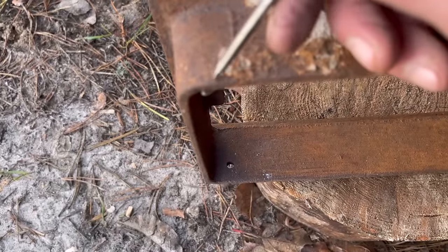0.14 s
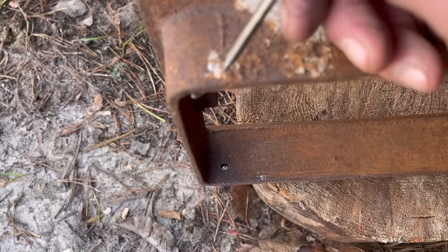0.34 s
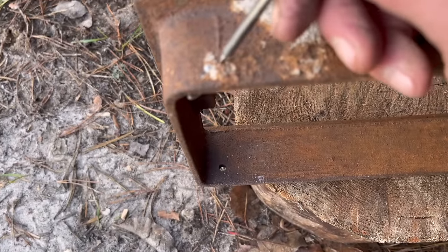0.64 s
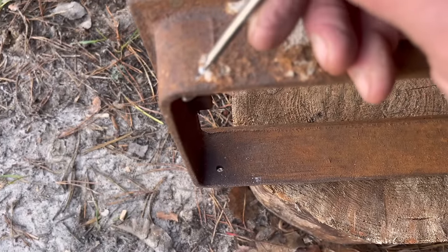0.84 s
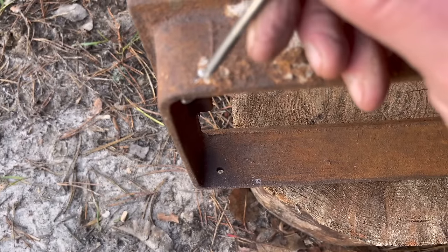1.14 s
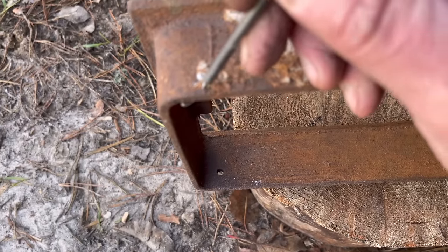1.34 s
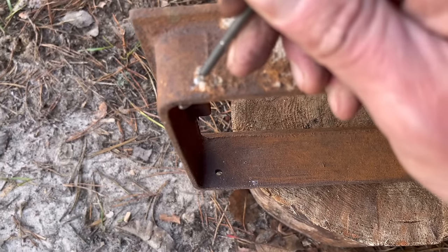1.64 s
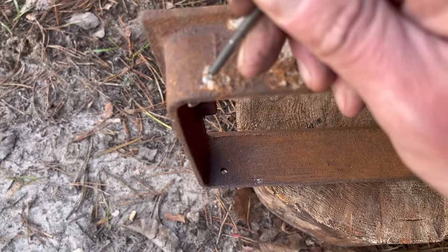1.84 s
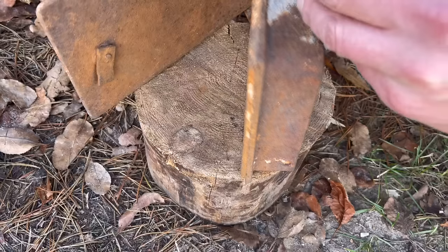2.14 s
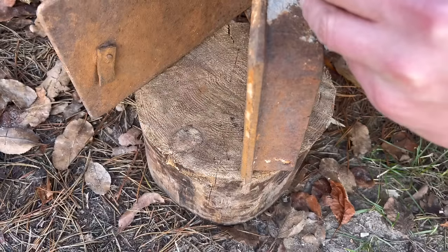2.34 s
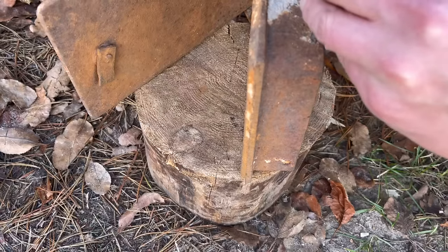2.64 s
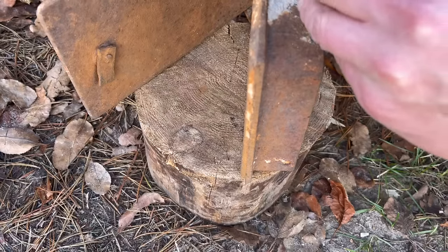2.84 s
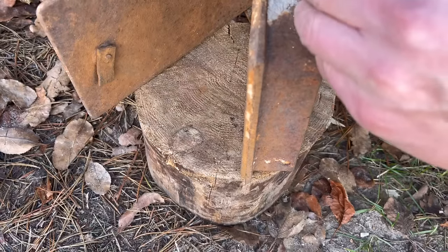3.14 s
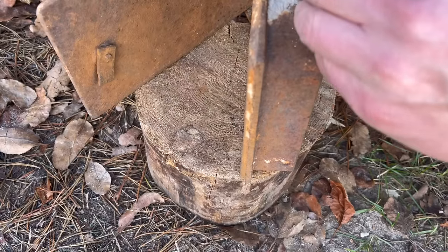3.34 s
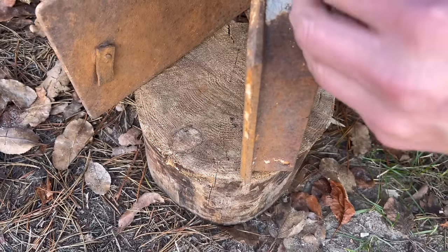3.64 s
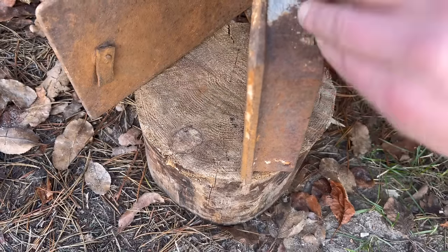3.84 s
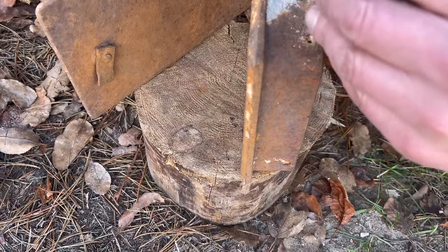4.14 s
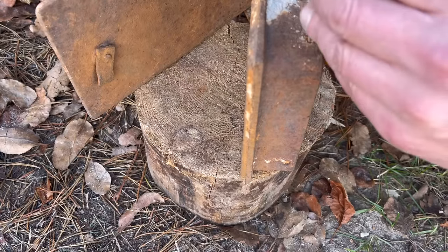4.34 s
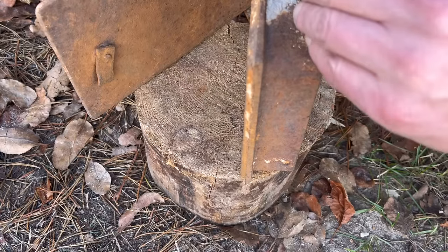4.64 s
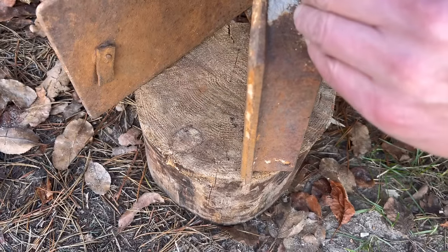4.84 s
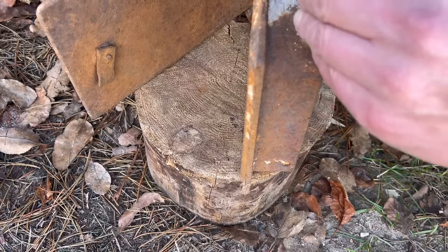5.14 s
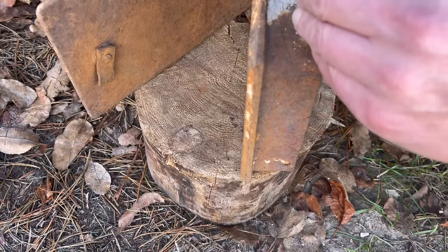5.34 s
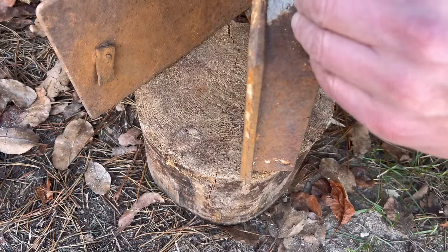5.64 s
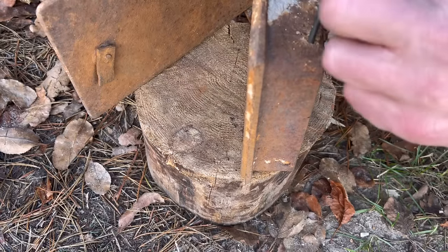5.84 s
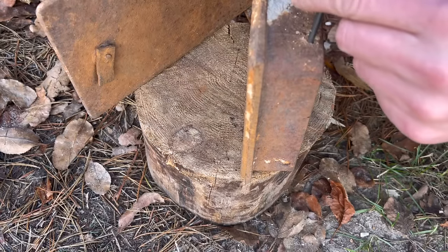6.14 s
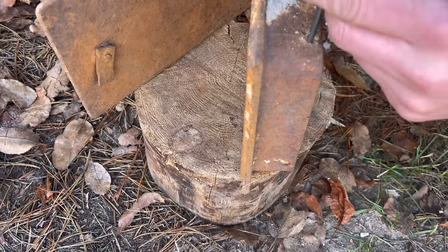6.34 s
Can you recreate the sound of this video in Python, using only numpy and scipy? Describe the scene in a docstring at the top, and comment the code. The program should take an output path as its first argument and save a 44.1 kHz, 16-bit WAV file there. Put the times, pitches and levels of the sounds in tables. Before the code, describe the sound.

Small irregular metal ticks and short gritty scratches come first, close to a phone microphone. Then hammer on nail: bright, short steel rings with a dull frame thud and ground shake, four evenly spaced. After a gap with soft skin hiss and barely audible scrapes, six further strikes come at a quick steady pace, losing their low thud. Dry, quiet outdoor setting.

```python
"""Hammering a nail on rusty steel

A rusty steel frame lies on a tree stump outdoors, close to a phone. A nail is scratched and set down on it,
then hammered. Each blow rings nail and steel as decaying modes and bursts of coloured noise; heavy ones also
make the frame clatter, thud on the stump and shake the ground. Between blows the fingers rub as wavering hiss
and grit ticks on the rust. Phone rumble and quiet outdoor air, both coloured noise, lie underneath.
"""
import sys
import numpy as np
from scipy import signal
from scipy.fft import rfft, irfft, next_fast_len
from scipy.io import wavfile
from scipy.ndimage import uniform_filter1d

SR = 44100
rng = np.random.default_rng(int(sys.argv[2]) if len(sys.argv) > 2 else 0)


def int16_out(signal):
    """Quantize to a 16-bit WAV file."""
    q = np.round(np.clip(np.atleast_2d(signal).T, -1, 1) * 32767)
    wavfile.write(sys.argv[1], SR, q.astype(np.int16))


N = 285768

# Hammer blows. Each row: start in seconds, drive into the frame in dB, ring level in dB, tick level in dB,
# rebound delay in seconds, landing relative to first push in dB, frequency favoured by the contact in Hz.
HAMMER_BLOWS = [(2.1409, -20, -16.5, -24.5, 0.0058, -2.5, 7070),
                (2.538, -20.5, -18.5, -25, 0.0058, -11, 7050),
                (2.9026, -25.5, -18.5, -19.5, 0.024, -6.5, 4160),
                (3.251, -21, -16.5, -23, 0.0062, -10.5, 8750),
                (4.7727, -24.5, -22.5, -23.5, 0.018, 3, 4310), (5.0882, -24.5, -17, -22, 0.014, 1, 6370),
                (5.3813, -29, -19, -22, 0.017, 2.5, 8640), (5.6828, -46, -23, -25.5, 0.011, -7.5, 6160),
                (5.9782, -44.5, -21.5, -27.5, 0.0093, 5.5, 2970),
                (6.2375, -50, -22.5, -34, 0.011, -18.5, 8320)]
# Modes of the steel. Each row: frequency in Hz, time to fall by 60 dB in seconds,
# relative level in dB when hammered, relative level in dB when touched by the nail tip.
STEEL_MODES = [(291, 0.15, -5, -14), (800, 0.11, 8, -19), (822, 0.15, 2, -20), (1174, 0.08, 4, -13),
               (1330, 0.15, -18, -4), (1550, 0.16, -3, -18), (1638, 0.26, -15, -8), (1863, 0.1, -3, -11),
               (2150, 0.09, 4, -8), (2256, 0.13, 4, -5), (2417, 0.42, -19, -37), (2710, 0.11, 2, -13),
               (2907, 0.2, -12, -22), (3214, 1.4, -36, -48), (3280, 0.1, -5, -2), (4054, 0.12, -22, -2),
               (4375, 0.09, -6, 2), (4560, 0.09, -2, -2), (4790, 0.14, -24, -14), (5992, 0.2, -16, -25),
               (6372, 0.12, -11, -2), (6742, 0.09, -9, -10), (7079, 0.17, -28, -11), (7881, 0.13, -30, -6),
               (8140, 0.13, -6, -12), (8484, 0.13, -25, -9), (8689, 0.16, -15, -23), (9398, 0.13, -11, -14),
               (9604, 0.21, -12, -29), (11500, 0.13, -19, -19)]
# The nail tip lands or catches. Each row: start in seconds, level in dB, body relative to treble in dB.
TIP_TOUCHES = [(.1, -46, -2.5), (.153, -49, 2), (0.228, -50.5, 0), (.243, -37.5, -1.5), (.3105, -30, -8.5),
               (.406, -44, 3.5), (.449, -33.5, 1), (.460, -31.5, -3.5), (0.555, -54.5, 3.5),
               (0.593, -58, -0.5), (.766, -36.5, 5.5), (1.147, -44, 1), (1.181, -49.5, -5),
               (1.2749, -45.5, 0.5), (1.578, -49, -20), (1.602, -40, -4.5), (1.634, -47, -11.5),
               (2.987, -37, -18)]
# The tip is dragged over the rust. Each row: start in seconds, end in seconds, level in dB,
# body relative to treble in dB.
TIP_SCRAPES = [(0.079, 0.124, -46, -2.5), (0.241, 0.328, -42, -1.5), (0.761, 0.803, -37.5, 6.5),
               (1.149, 1.190, -51.5, 0), (1.57, 1.643, -48, -17), (3.548, 3.633, -61, -15.5),
               (3.728, 3.776, -56.5, -1.5), (3.826, 3.909, -59, 2), (4.351, 4.39, -67, 2),
               (4.717, 4.766, -60.5, -1.5)]
# How freely the frame rings under the steadying hand. Each row: time in seconds, relative level in dB.
FRAME_FREEDOM = [(1.15, 0), (1.7, -6), (2.99, -2), (3.6, -2.5)]
# Grit cracks without ringing. Each row: start in seconds, relative level in dB.
GRIT_CRACKS = [(1.445, -56), (1.518, -58), (1.711, -56), (2.818, -58.5), (2.842, -60.5), (3.101, -57.5),
               (3.131, -52), (3.444, -56)]
# Soft bumps of hand and frame on the stump. Each row: start in seconds, level in dB.
STUMP_BUMPS = [(.865, -53.5), (1.618, -58.5), (2.09, -54), (2.455, -52.5), (3.33, -47), (3.88, -53.5),
               (3.949, -53.5), (5.925, -57.5)]
# Fingers slide on nail and frame. Each row: start in seconds, end in seconds, relative hiss level in dB.
FINGER_RUBS = [(.1, 0.678, -73.5), (1.3, 1.5, -66.5), (1.87, 1.927, -59.5), (2.05, 2.402, -61),
               (2.397, 3.45, -67), (3.45, 4.097, -66.5), (4.37, 4.92, -70), (5.1, 6.476, -64),
               (5.48, 5.656, -60), (6.39, 6.481, -58.5)]

# Noise colours. Each row of every colour: frequency in Hz, relative level in dB.
# The frame on the stump: dull thud and metallic clatter.
THUD_COLOUR = [(40, -18.5), (75, -2.5), (190, -0.5), (300, -7), (400, -1), (510, -10), (800, -5.5),
               (1200, -14.5), (2000, -40)]
CLANG_COLOUR = [(500, -26), (900, -17), (1200, 3.5), (1400, -5.5), (1580, 0), (1950, -4), (2300, -3),
                (2700, -0.5), (3350, -7), (3700, -7.5), (6000, -26)]
# Dense high modes of the steel, under the hammer and under the nail tip.
RING_COLOUR = [(1500, -36.5), (3000, -12), (3700, -9), (4500, 1), (5300, -5), (6500, -3), (7500, -3.5),
               (8500, 0.5), (9200, -15), (10300, 10.5), (11400, -6.5), (12200, -9), (13200, -32),
               (15500, -45.5)]
TIP_COLOUR = [(1500, -44), (3000, -4.5), (3600, 0), (4050, 2.5), (4600, -17.5), (5400, 0.5), (6700, -2.5),
              (7400, -3), (8500, -3), (9500, -4), (11300, 12), (12300, -28.5), (13500, -27.5),
              (15500, -32.5)]
# Dense low modes of the steel under the nail tip.
BODY_COLOUR = [(30, -24), (85, -4), (130, 5.5), (420, 1), (560, 0.5), (900, -1.5), (1350, -4.5), (2200, -5),
               (3000, -2.5), (4500, -23)]
# The click of steel on steel, and the crack of grit.
TICK_COLOUR = [(1000, -23), (3600, -13), (4500, -2.5), (5400, -5), (8000, -10.5), (11500, 5.5),
               (12800, -17.5), (16000, -32)]
CRACK_COLOUR = [(2500, -24), (3500, -2.5), (6000, -10), (10000, -1.5), (12500, 1)]
# Finger skin on metal.
SKIN_COLOUR = [(200, 4.5), (900, 0), (2200, 0.5), (4500, 1), (6500, -3.5), (8800, 1), (11000, 7),
               (12000, -6.5), (13000, -28.5)]
# Shaking ground, also used for phone rumble.
GROUND_COLOUR = [(20, -20.5), (45, -9), (70, -6), (92, -5), (120, -17), (220, -29.5), (600, -56.5)]
# Outdoor air.
AIR_COLOUR = [(30, 5.5), (90, 17.5), (200, 6), (500, 3), (1000, -11), (2500, -2), (5000, -15), (11000, -9),
              (13000, -29)]
# Phase between the two microphone ports. Each row: frequency in Hz, lead of the left in radians.
PORT_PHASE_LEAD = [(100, 0), (500, .3), (1200, 0), (1700, -.6), (2300, .5), (2900, 1.5), (3450, 1.3),
                   (3750, 0), (5200, 1.0), (6600, 0), (7550, 1.5), (8500, .1), (10200, -3.1), (13400, -9)]
# Level between the ports. Each row: frequency in Hz, left minus right in dB.
PORT_LEVEL_BALANCE = [(150, .7), (1100, 3), (1600, 1), (2000, 5), (3000, 2), (4000, 2), (4900, 6),
                      (6100, 0), (7300, 6), (8200, .5), (12000, 0)]

AGE = np.arange(int(1.2 * SR)) / SR  # seconds since a contact
ATTACK = int(.03 * SR)  # samples
# Weaker modes crowd round the strong ones: fine peaks and valleys, the same for every contact.
CROWD_HZ = np.arange(0, SR / 2, 45)
CLUSTERS = np.exp(-((CROWD_HZ - np.array(STEEL_MODES)[:, :1]) / 85) ** 2).max(axis=0)
CROWD = 2.2 * CLUSTERS + .7 * rng.standard_normal(len(CROWD_HZ))

# Parts of a blow follow its drive: level in dB at full drive, and dB gained per dB of drive.
FULL_DRIVE_DB = -24
CLANG_DB, CLANG_SLOPE = -26, 1  # clatter, relative to the share of each contact
SHAKE_DB, SHAKE_SLOPE = -36, 0.59  # ground
FLEX_DB, FLEX_SLOPE = -29, 1.25  # lowest modes, below FLEX_TOP_HZ
BEND_DB, BEND_SLOPE = -26, 0.93  # higher bending modes, below BEND_TOP_HZ
FLEX_TOP_HZ, BEND_TOP_HZ = 1000, 2800
# High modes near the favoured frequency speak more: boost and width.
FAVOUR_DB, FAVOUR_OCTAVES = 5.5, 0.043
# For the last blows the hand holds the frame loosely, and its long-lived modes ring louder.
LOOSE_FROM_S, LONG_T60_S, LOOSE_DB = 5.3, .25, 4.5
# After a touch the tip settles once more, faintly: mean delay and level.
SETTLE_S, SETTLE_DB = .06, -62
SLIPS_PER_S, SLIP_SPREAD_DB = 450, 5  # mean rate and unevenness of a scrape's jumps
# Finger movements; the hiss of a still grip is relative, like the rubs.
RUB_ATTACK_S, RUB_RELEASE_S, GRIP_DB = 0.042, 0.02, -81.5
WAVER_DB, WAVER_S = 1.5, .07  # slow wavering of finger pressure: spread and time scale
# The phone sways with each swing of the arm; its level is relative to the shake of the ground.
SWAY_DB, SWAY_LAG_S, SWAY_WIDTH_S = -19.5, 0.1, 0.095
# Rumble of the held phone at rest, and while the nail is worked into place.
STILL_DB, PLACING_DB, PLACING_END_S = -74, -64.5, 1.33
TOP_HZ = 16400  # upper limit of the phone


def hammer(shapes):
    """Steel meets steel with a tick and a ring, and the struck frame jolts the stump and ground."""
    out = np.zeros((2, N))
    hz, t60, held_db, _ = np.transpose(STEEL_MODES)
    for t, drive_db, ring_db, tick_db, delay, rebound_db, favoured_hz in HAMMER_BLOWS:
        mode_db = held_db + LOOSE_DB * (t > LOOSE_FROM_S) * (t60 > LONG_T60_S)
        # the first push and the landing share the energy of thud and clatter
        shares = np.array([1, undb(rebound_db)]) / np.hypot(1, undb(rebound_db))
        add(out, t, undb(tick_db) * burst(TICK_COLOUR, rise=.0003, t60=0.018))
        add(out, t, undb(ring_db) * struck_ring(shapes, mode_db, favoured_hz))
        for lag, share in zip((.0008, delay), shares):
            add(out, t + lag, share * frame_on_stump(drive_db))
        # bending modes start between the two contacts, nearer the stronger one
        add(out, t + delay * shares[1] ** 2, frame_bending(shapes, mode_db, drive_db))
        add(out, t, undb(shake_level(drive_db)) * burst(GROUND_COLOUR, rise=0.0054, t60=.36))
    return out


def struck_ring(shapes, mode_db, favoured_hz):
    """Where the head lands on the nail decides which high modes speak most; a dense crowd rings along."""
    hz = np.transpose(STEEL_MODES)[0]
    octaves_off = np.log2(hz / favoured_hz)
    favour_db = FAVOUR_DB * np.exp(-(octaves_off / FAVOUR_OCTAVES) ** 2)
    high_modes = ring(shapes, undb(mode_db + favour_db + .5) * (hz >= BEND_TOP_HZ))
    return high_modes + undb(-4.5) * burst(RING_COLOUR, rise=.001, t60=.088)


def frame_on_stump(drive_db):
    """One contact of frame and stump: a dull thud with a clatter of dense modes."""
    thud = undb(drive_db) * burst(THUD_COLOUR, rise=.002, t60=.075)
    clang_db = follow(drive_db, CLANG_DB, CLANG_SLOPE)
    return thud + undb(clang_db) * burst(CLANG_COLOUR, rise=.002, t60=.11)


def frame_bending(shapes, mode_db, drive_db):
    """The frame flexes and rings on in its low modes; the lowest fade fastest as blows get lighter."""
    hz = np.transpose(STEEL_MODES)[0]
    flex_db = follow(drive_db, FLEX_DB, FLEX_SLOPE)
    bend_db = follow(drive_db, BEND_DB, BEND_SLOPE)
    low_db = np.where(hz < FLEX_TOP_HZ, flex_db, bend_db)
    return ring(shapes, undb(mode_db + low_db) * (hz < BEND_TOP_HZ))


def shake_level(drive_db):
    """The ground shakes less unevenly than the frame is driven; level in dB."""
    return follow(drive_db, SHAKE_DB, SHAKE_SLOPE)


def nail_touches(shapes):
    """The tip taps down or catches, nudges the ground, and settles once more."""
    out = np.zeros((2, N))
    for t, db, body_db in TIP_TOUCHES:
        add(out, t, undb(db) * tip_response(shapes, t, body_db))
        settle_delay = SETTLE_S * (.5 + rng.random())
        add(out, t + settle_delay, undb(SETTLE_DB) * tip_response(shapes, t, body_db))
        add(out, t, undb(db + body_db - 19.5) * burst(GROUND_COLOUR, rise=0.0059, t60=0.2))
    return out


def nail_scrapes(shapes):
    """The tip sticks and slips over the rust in uneven little jumps, each exciting the frame."""
    out = np.zeros((2, N))
    for start, end, db, body_db in TIP_SCRAPES:
        n = max(int((end - start) * SR), ATTACK)
        jumps = rng.random(n) < SLIPS_PER_S / SR
        strengths = undb(SLIP_SPREAD_DB * rng.standard_normal(n))
        slips = jumps * strengths * signal.windows.tukey(n, .4)
        x = signal.fftconvolve(tip_response(shapes, start, body_db), slips[None], axes=1)
        rms = np.sqrt(np.mean(x[:, :n] ** 2) + 1e-18)
        add(out, start, undb(db) * x / rms)
    return out


def tip_response(shapes, t, body_db):
    """The frame's answer to one catch of the nail tip; the less it moves the body, the more it ticks."""
    hz, _, _, mode_db = np.transpose(STEEL_MODES)
    free_db = np.interp(t, *np.transpose(FRAME_FREEDOM))
    modes = ring(shapes, undb(mode_db + free_db - 2.5 + body_db * (hz < BEND_TOP_HZ)))
    treble = undb(-3) * burst(TIP_COLOUR, rise=.0006, t60=.085)
    body = undb(body_db - 10) * burst(BODY_COLOUR, rise=.001, t60=.11)
    tick = undb(-13.0 - 0.4 * body_db) * burst(TICK_COLOUR, rise=0.00021, t60=0.01)
    return modes + treble + body + tick


def grit():
    """Grains crack on the rust: very short bright bursts that wake no steel modes."""
    out = np.zeros((2, N))
    for t, db in GRIT_CRACKS:
        add(out, t, undb(db - 8) * burst(CRACK_COLOUR, rise=0.00024, t60=0.0083))
    return out


def bumps():
    """Soft pushes that reach only the stump and the ground."""
    out = np.zeros((2, N))
    for t, db in STUMP_BUMPS:
        ground = burst(GROUND_COLOUR, rise=0.0073, t60=0.16)
        thud = undb(-18.0) * burst(THUD_COLOUR, rise=.006, t60=0.055)
        add(out, t, undb(db) * (ground + thud))
    return out


def finger_rubs():
    """Skin slides softly on nail and frame: hiss whose level wavers with finger pressure."""
    pressure_db = WAVER_DB * wander(WAVER_S) + .6 * wander(.012)
    slides = [undb(db) * stroke(start, end, RUB_ATTACK_S, RUB_RELEASE_S) for start, end, db in FINGER_RUBS]
    hiss = np.hypot(undb(GRIP_DB), np.linalg.norm(slides, axis=0))
    return hiss * undb(pressure_db - 5.0) * pair(SKIN_COLOUR, N, ripple_db=3.0)


def phone_rumble():
    """The held phone rumbles faintly, more as the nail is placed and as it sways after each blow."""
    t = np.arange(N) / SR
    movements = [undb(PLACING_DB) * stroke(0, PLACING_END_S, attack=0.0074, release=0.11)]
    for blow_s, drive_db, *_ in HAMMER_BLOWS:
        distance = (t - blow_s - SWAY_LAG_S) / SWAY_WIDTH_S
        movements.append(undb(shake_level(drive_db) + SWAY_DB) / np.hypot(1, distance) ** 2)
    level = np.hypot(undb(STILL_DB), np.linalg.norm(movements, axis=0))
    return level * pair(GROUND_COLOUR, N)


def outdoor_air():
    """Quiet steady air noise, less alike at the two ports than the nearby sounds."""
    return undb(-75.5) * pair(AIR_COLOUR, N, spread=.5)


def mode_shapes():
    """Free decay of each mode of the steel; vibration takes a moment to spread through it."""
    hz, t60 = np.transpose(STEEL_MODES)[:2, :, None]
    decay = np.exp((2j * np.pi * hz - np.log(1000) / t60) * AGE)
    return (decay * (1 - np.exp(-AGE / .002))).astype(np.complex64)


def ring(shapes, gains):
    """Every contact point weights the modes anew; each port hears them a little differently."""
    count = len(gains)
    phases = np.exp(2j * np.pi * rng.random(count))
    weight = gains * undb(1.3 * rng.standard_normal(count)) * phases
    ports = np.exp(.1 * (rng.standard_normal((2, count)) + 1j * rng.standard_normal((2, count))))
    return ((weight * ports).astype(np.complex64) @ shapes).imag


def burst(colour, rise, t60):
    """Crowded modes that swell and die together; rise and t60 in seconds, rms 1 over the attack."""
    age = AGE[:len(AGE) // 3]
    crowd = pair(colour, len(age), ripple_db=4.0)
    x = crowd * (1 - np.exp(-age / rise)) * np.exp(-np.log(1000) * age / t60)
    rms = np.sqrt(np.mean(x[:, :ATTACK] ** 2))
    return np.pad(x / rms, ((0, 0), (0, len(AGE) - len(age))))


def pair(colour, size, spread=.17, ripple_db=0):
    """Coloured noise at two close ports: a common part plus a part of opposite sign, scaled by spread."""
    common = noise(colour, size, ripple_db)
    return common + spread * np.array([[1], [-1]]) * noise(colour, size, ripple_db)


def noise(colour, size, ripple_db):
    """Noise of the given colour, closed steeply at both ends and rippled by the crowded modes; rms 1."""
    n = next_fast_len(size)
    hz = np.fft.rfftfreq(n, 1 / SR)
    inside = np.minimum((hz + 1) / colour[0][0], colour[-1][0] / (hz + 1)).clip(0, 1) ** 4
    # the ripple is gentler below 3 kHz
    ripple = ripple_db * np.interp(hz, CROWD_HZ, CROWD) * np.minimum(hz / 3000, 1)
    spectrum = rfft(rng.standard_normal(n)) * inside * undb(along(colour, hz) + ripple)
    x = irfft(spectrum, n)[:size]
    return x / x.std()


def stroke(start, end, attack, release):
    """Envelope of one movement: it swells from start, holds until end and dies away."""
    t = np.arange(N) / SR
    swell = 1 - np.exp(-np.maximum(t - start, 0) / attack)
    return swell * np.exp(-np.maximum(t - end, 0) / release)


def wander(seconds):
    """Smooth chance that changes over the given time; spread 1."""
    size = int(seconds * SR)
    x = uniform_filter1d(uniform_filter1d(rng.standard_normal(N), size), size)
    return x / x.std()


def follow(drive_db, full_db, slope):
    """Level in dB of a part of a blow that grows with the drive."""
    return full_db + slope * (drive_db - FULL_DRIVE_DB)


def along(points, hz):
    """Rows of (Hz, value) read on a log-frequency axis."""
    f, value = np.transpose(points)
    return np.interp(np.log(hz + 1), np.log(f), value)


def undb(db):
    """Decibels to gain."""
    return 10 ** (np.asarray(db) / 20)


def add(out, t, x):
    """Mix x into out from time t in seconds."""
    i = max(int(t * SR), 0)
    out[:, i:i + x.shape[1]] += x[:, :N - i]


def scene():
    """Hammer and nail work on the same piece of steel, over fingers, phone rumble and outdoor air."""
    shapes = mode_shapes()
    work = hammer(shapes) + nail_touches(shapes) + nail_scrapes(shapes) + grit() + bumps()
    return work + finger_rubs() + phone_rumble() + outdoor_air()


def record(dry):
    """The phone shifts phase and level between its ports, thins both ends of the range and rounds peaks."""
    n = next_fast_len(N + ATTACK)
    hz = np.fft.rfftfreq(n, 1 / SR)
    side = np.array([[.5], [-.5]])  # left and right each take half the difference
    balance = undb(side * along(PORT_LEVEL_BALANCE, hz))
    ports = balance * np.exp(1j * side * along(PORT_PHASE_LEAD, hz))
    heard = irfft(rfft(dry, n) * ports, n)[:, :N]
    heard = signal.sosfilt(signal.butter(2, 45, "high", fs=SR, output="sos"), heard)
    heard = signal.sosfilt(signal.butter(4, 13200, fs=SR, output="sos"), heard)
    rounded = np.tanh(heard)
    return signal.sosfilt(signal.ellip(8, .2, 70, TOP_HZ, fs=SR, output="sos"), rounded)


dry = scene()
out = record(dry)
int16_out(out)
```